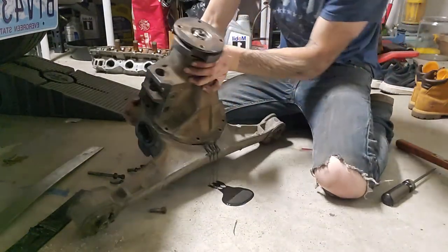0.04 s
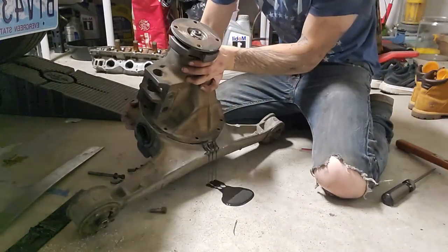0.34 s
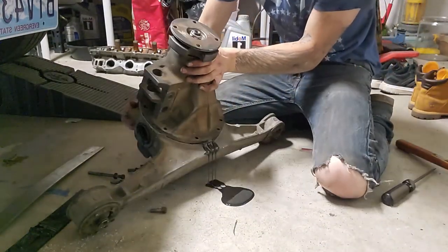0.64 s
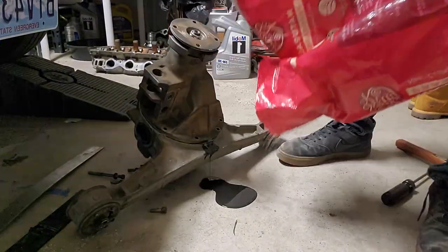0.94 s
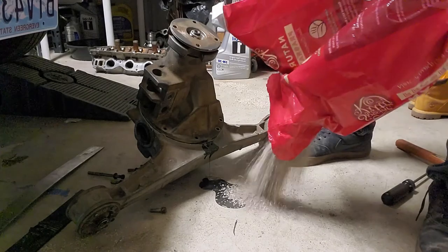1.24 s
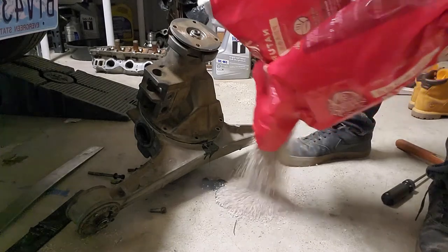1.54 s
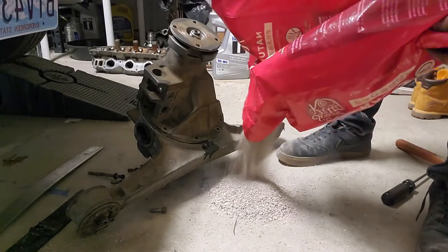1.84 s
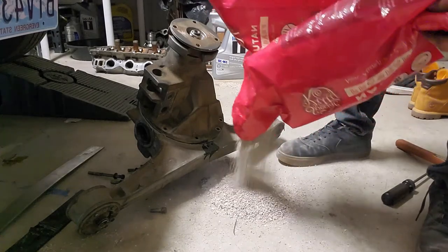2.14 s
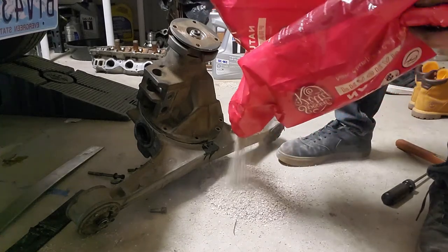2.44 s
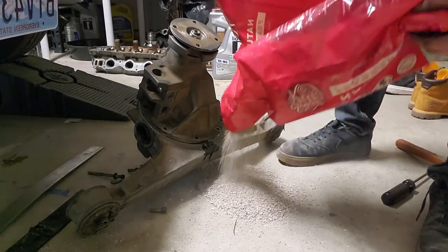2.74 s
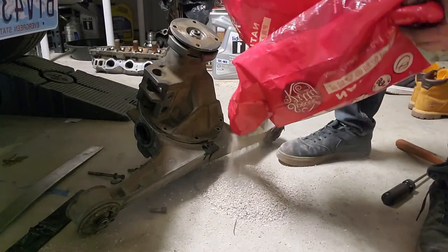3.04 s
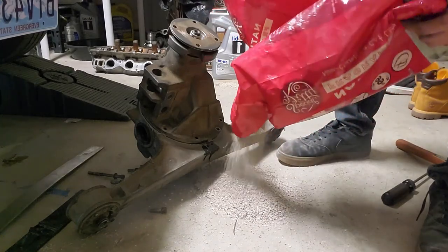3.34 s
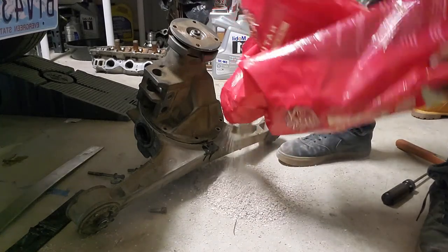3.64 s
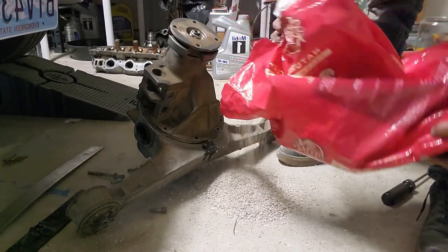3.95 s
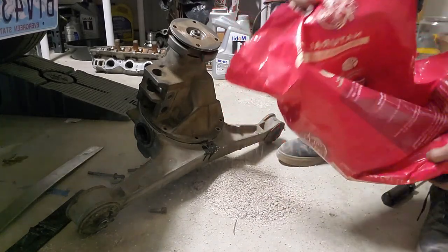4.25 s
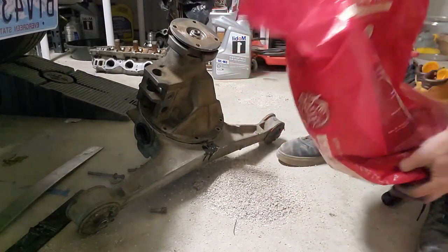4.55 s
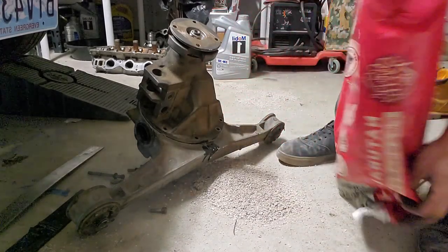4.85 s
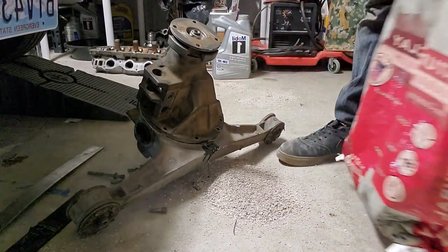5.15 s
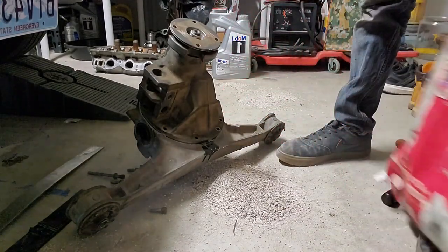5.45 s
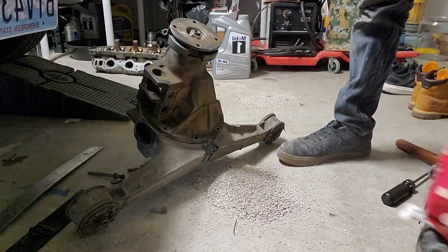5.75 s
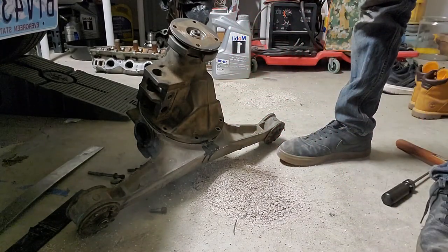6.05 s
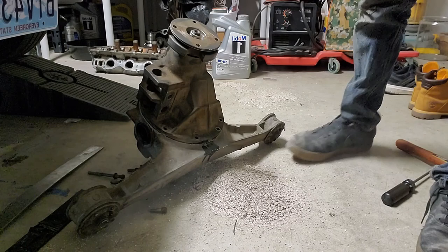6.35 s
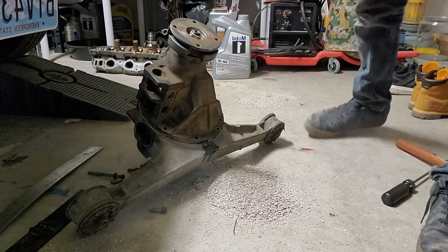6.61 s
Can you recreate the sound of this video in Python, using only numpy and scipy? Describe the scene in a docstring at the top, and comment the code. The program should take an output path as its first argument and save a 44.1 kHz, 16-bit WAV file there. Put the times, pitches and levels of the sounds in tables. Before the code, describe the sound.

After a few faint, low knocks from a metal casting, granules spill onto a concrete floor in a dense, gritty hiss that gradually tapers. The plastic bag crinkles throughout, snapping and flapping most as the pour ends. Leftover litter rushes to the bottom of the bag, then the rustling grows sparser, with a soft footstep near the end. Everything is heard close up in a fairly dry garage.

```python
"""A garage floor: a cast axle housing knocks and rings as it is steadied, then clay litter is poured
from a stiff plastic bag. The grains hiss and clack on the concrete and thin to a trickle. The bag
buckles and crackles as it is tipped, the rest of the litter slides back to its bottom, and the bag
is carried aside."""
import sys
import numpy as np
from scipy import signal
from scipy.fft import rfft, irfft
from scipy.io import wavfile
from scipy.ndimage import uniform_filter1d

SR = 44100
rng = np.random.default_rng(int(sys.argv[2]) if len(sys.argv) > 2 else 0)


def int16_out(signal):
    """Quantize to a 16-bit WAV file."""
    q = np.round(np.clip(np.atleast_2d(signal).T, -1, 1) * 32767)
    wavfile.write(sys.argv[1], SR, q.astype(np.int16))


N = 298998
TIME = np.arange(N) / SR

# spectrum of a crease in the plastic: f/Hz, level/dB
PLASTIC_SPECTRUM = [(120, -8), (400, -4), (800, 3), (2000, 2), (4500, -0.5), (7000, -3), (9000, -3.5),
                    (10700, -13.5), (13500, -13), (15800, -23)]


def pour(start_s=0.892, heap_s=0.95):
    """Litter lands on concrete; the growing heap cushions the coarse pellets."""
    stream = [(0.92, -24), (1.39, -19.5), (1.59, -24.5), (1.95, -27.5), (2.11, -31.5), (2.3, -27),
              (2.41, -27), (2.58, -29.5), (2.76, -31.5), (2.78, -28.5), (3.04, -31), (3.35, -26.5),
              (3.38, -29.5), (3.45, -27)]  # grain flow: t/s, level/dB
    spectrum = [(200, -30), (700, -2), (870, -2.5), (1400, 5), (2000, 0.5), (2900, 2), (3300, 3), (3700, 0),
                (5400, 1.5), (7000, -2), (8800, 1.5), (10700, -13.5), (13000, -6), (15800, -18)]  # grains on concrete: f/Hz, level/dB
    flow = level_curve(stream, rise_s=1.4, fall_s=2.9)
    flow *= np.clip((TIME - start_s) / 0.009, 0, 1)  # the front lands all at once
    bare_floor = np.exp(-np.maximum(TIME - start_s, 0) / heap_s)
    hiss = grains(flow, spectrum, spread_db=0.7)
    return from_db(-3) * hiss + from_db(-6) * flow * bare_floor * pellets()


def grains(flow, spectrum, spread_db, full_per_s=9000, trickle_per_s=2000):
    """Clay grains tick as they collide; a thinner flow has fewer and sounds grittier."""
    per_s = full_per_s * flow / flow.max() + trickle_per_s
    return flow * evened(coloured(impacts(per_s, spread_db), spectrum), span_s=0.057)


def pellets():
    """The coarsest grains clack on concrete."""
    modes = [(800, 300, -6.5), (1260, 410, -2), (2100, 600, -8), (3250, 450, 0.5), (5400, 900, -6.5)]  # clack resonances: f/Hz, width/Hz, level/dB
    clicks = impacts(per_s=900, spread_db=1.5)
    clacks = sum(from_db(db) * resonance(clicks * rng.standard_normal(N), hz, width_hz)
                 for hz, width_hz, db in modes)
    return evened(clacks, span_s=0.08)


def slide():
    """Litter slides to the bottom of the bag, and again as it is carried off."""
    slides = [
        [(4.42, -34.5), (4.7, -23), (4.85, -24.5), (4.97, -26.5), (5.082, -41.5), (5.24, -47)],
        [(6.055, -32.5), (6.15, -44), (6.32, -55)],
    ]  # grain flow, one list per slide: t/s, level/dB
    spectrum = [(200, -57), (600, -6), (1100, 1.5), (2100, 0.5), (4000, -1.5), (6700, -5), (8900, -4),
                (10700, -18), (13500, -13.5), (15800, -24)]  # grains in the bag: f/Hz, level/dB
    flow = sum(level_curve(rows, rise_s=0.059, fall_s=0.25) for rows in slides)
    return from_db(2.45) * grains(flow, spectrum, spread_db=3)


def plastic_bag(panel_hz=593):
    """Tugs and strain make the bag crinkle, flutter and heave; panels buckle over low thuds."""
    tugs = [(0.888, .13, -25, -23.5), (1.093, 0.066, -30, -25), (1.25, 0.22, -39, -51),
            (1.562, 0.087, -29, -37), (1.69, 0.14, -33, -27.5), (2.231, 0.097, -29.5, -35),
            (2.372, 0.18, -41, -48), (2.608, 0.027, -34, -31), (2.758, 0.067, -28, -23),
            (2.928, 0.036, -28, -23), (3.041, 0.066, -34.5, -26.5), (3.13, 0.13, -35.5, -28.5),
            (3.288, 0.048, -36, -28), (3.43, 0.043, -35, -26), (3.509, 0.1, -29, -23.5),
            (3.611, 0.14, -26, -19), (3.775, 0.096, -27.5, -18.5), (3.937, 0.091, -29, -24),
            (4.083, 0.073, -28.5, -20.5), (4.224, 0.093, -43, -26.5), (4.397, 0.34, -42, -27),
            (4.628, .17, -25.5, -23), (4.825, 0.22, -32, -32), (5.102, .04, -44, -29),
            (5.253, 0.14, -36.5, -32), (5.445, 0.08, -36, -28), (5.536, 0.063, -29.5, -30.5),
            (5.702, .08, -33.5, -31.5), (5.809, 0.047, -42, -34.5), (5.897, 0.051, -35, -34),
            (6.054, 0.098, -28.5, -28), (6.201, 0.094, -30.5, -32.5), (6.353, 0.14, -38.5, -31),
            (6.521, .06, -48, -38.5), (6.712, 0.12, -40, -39)]  # tugs, shakes, swings: t/s, length/s, flex/dB, crinkle/dB
    strain_levels = [(.95, -27), (2.1, -43.5), (2.72, -43.5), (2.9, -36.5), (3.7, -31.5), (4.9, -25),
                     (5.2, -43.5), (6.3, -37), (6.65, -49)]  # strain between tugs: t/s, level/dB
    buckles = [(1.009, -18.5), (1.713, -23.5), (1.814, -23), (1.834, -19.5), (2.048, -25.5), (2.278, -21),
               (2.299, -24), (2.768, -21), (3.306, -20), (3.633, -15), (3.694, -14.5), (3.802, -24),
               (5.589, -34), (6.364, -27)]  # whole panels buckling: t/s, level/dB
    thuds = [(1.715, -26.5, 100), (1.81, -33, 95), (2.29, -23, 320), (2.39, -34, 75), (3.31, -32, 90),
             (3.64, -31, 80), (4.3, -28.5, 130), (5.32, -28, 225), (5.335, -35, 60.4), (6.449, -25.5, 217)]  # low thuds of the bag and a footstep: t/s, level/dB, f/Hz
    start_s, length_s, flex_db, crinkle_db = np.transpose(tugs)
    strain = level_curve(strain_levels, rise_s=0.06, fall_s=0.93)
    resting_flex = from_db(-4.5) * strain
    flex = np.hypot(tug_curve(start_s, length_s, flex_db), resting_flex)
    # the load answers lower down and settles more slowly
    heave = np.hypot(tug_curve(start_s, length_s, flex_db, release_s=0.023), resting_flex)
    creasing = np.hypot(tug_curve(start_s, length_s, crinkle_db), from_db(1.5) * strain)
    bag = from_db(-4) * creasing * crinkle()
    bag += from_db(-5.5) * flex * flutter(low_hz=203, high_hz=815, per_s=300, damping=0.3, count=12)
    bag += from_db(-16.5) * heave * flutter(low_hz=67, high_hz=196, per_s=130, damping=0.55, count=10)
    bag += from_db(-0.5) * flaps([(s, db, panel_hz) for s, db in buckles], decay_cycles=4.5, damping=0.41)
    bag += from_db(14.5) * creasing * ticks()
    bag += from_db(-0.5) * snaps()
    return bag + flaps(thuds, decay_cycles=2.5, damping=0.94)


def tug_curve(starts_s, lengths_s, levels_db, attack_s=0.0067, release_s=0.017):
    """Gain that rises with each tug, holds, then relaxes."""
    power = np.zeros(N)
    for s, length_s, db in zip(starts_s, lengths_s, levels_db):
        rise = 1 - np.exp(-np.maximum(TIME - s, 0) / attack_s)
        relax = np.exp(-np.clip((TIME - s - length_s) / release_s, 0, 20))
        power += (from_db(db) * rise * relax) ** 2
    return np.sqrt(power)


def snaps(crackle_s=0.0042, strain_s=0.0006, size=2048):
    """The sheet creaks up to a spike as a large crease flips, then crackles and rings briefly."""
    creases = [(0.894, -18.5, 1960, 2, 4.5), (0.945, -15.5, 3900, 22, 0), (1.0134, -13, 2650, 11, -13),
               (1.637, -17, 3020, 16, -12), (2.2157, -15, 3950, -3, -5), (2.315, -19.5, 5240, 1, -2),
               (2.4378, -20, 2150, 6.5, 12.5), (2.7778, -23.5, 1340, 6, 9), (2.9397, -22.5, 1020, 0, 4),
               (3.2337, -29.5, 1940, 2, 19), (3.3098, -15.5, 2540, 0, 4), (3.3556, -11.5, 4130, 6, -9.5),
               (3.4739, -23, 1970, 15, 2), (3.5249, -15.5, 1450, 8, -3), (3.5751, -28, 1990, 18, 15),
               (3.6402, -11, 953, 9, -15), (3.6594, -13, 1730, 11, -4.5), (3.7, -13, 910, 2, -15),
               (3.7773, -14.5, 1790, 2, -6), (3.8156, -10.5, 3420, -1, -8), (3.8564, -27, 1780, 15, 1),
               (3.934, -19, 1290, 21, -17), (3.9633, -12, 4140, 15, 1), (3.9841, -15, 1460, 11, -15),
               (4.0731, -12.5, 4740, 11, -21), (4.087, -19.5, 1520, 0, 3), (4.1374, -19.5, 1340, 25.5, 5),
               (4.2877, -26, 1490, 20, 4), (4.3694, -16.5, 4700, 12, -1), (4.3844, -25, 2400, 7, 8),
               (4.3994, -18, 1510, 5, -14), (4.4903, -15, 2830, 8, -4), (4.6266, -14.5, 1940, 3, -7),
               (4.7861, -13.5, 2150, 4, 4.5), (5.2807, -32, 1410, 0, 16), (5.3142, -24, 1190, 2, 8.5),
               (5.4554, -27, 2900, 5, 8.5), (5.5469, -28, 4700, 5, 11), (5.5616, -26.5, 2640, 8, 12),
               (5.7045, -25.5, 950, 5, 7), (5.7393, -24, 2840, 8, 8.5), (5.7752, -27, 925, 11, 12),
               (5.892, -27.5, 860, 13, 6), (5.9272, -26, 923, 8, 12), (6.1248, -25.5, 1010, 20, 4),
               (6.2816, -23.5, 956, 12, 2), (6.3648, -16, 3760, 1, 0), (6.4378, -19, 5560, 5, 10.5),
               (6.4482, -25.5, 2340, 4, 11)]  # flips: t/s, crackle/dB, f/Hz, spike/dB re crackle, ring/dB re crackle
    out, spike_at = np.zeros(N), size // 8
    t = TIME[:size] - TIME[spike_at]
    swell = np.exp(-np.maximum(t / crackle_s, -t / strain_s))
    for s, crackle_db, hz, spike_db, ring_db in creases:
        burst = swell * rng.standard_normal(size)
        burst[spike_at] = from_db(spike_db)
        ring = resonance(burst, hz, hz / 3)  # broad: plastic is well damped
        add(out, s + strain_s - TIME[spike_at], from_db(crackle_db) * (burst + from_db(ring_db) * ring))
    return coloured(out, PLASTIC_SPECTRUM)


def crinkle(per_s=600, count=6):
    """A shower of small creases; each size rings at its own pitch."""
    spectrum = [(120, -26), (400, 0.5), (800, 4), (1300, 1.5), (2200, 0.5), (4500, -4), (7000, -4),
                (9000, -4.5), (10700, -15), (13500, -16), (15800, -21)]  # crinkling sheet: f/Hz, level/dB
    shower = np.zeros(N)
    for hz in np.geomspace(700, 5000, count):
        bursts = crackle(impacts(per_s / count, spread_db=4), tail_s=0.0055, tail_db=-16)
        shower += bursts + from_db(9.5) * resonance(bursts, hz, 0.41 * hz)
    return evened(coloured(shower, spectrum), span_s=0.04)


def ticks(per_s=30, spread_db=4.5):
    """Lone small creases flick over with a dry tick."""
    sizes = from_db(spread_db * np.clip(rng.standard_normal(N), -2, 1))
    clicks = sizes * (rng.random(N) < per_s / SR)
    return coloured(crackle(clicks, tail_s=0.002, tail_db=-21), PLASTIC_SPECTRUM)


def crackle(clicks, tail_s, tail_db):
    """Crease clicks, each with a short noisy tail."""
    tail_power = signal.lfilter([1], [1, -np.exp(-1 / (tail_s * SR))], clicks ** 2 + 1e-18)
    return clicks + from_db(tail_db) * np.sqrt(tail_power) * rng.standard_normal(N)


def flutter(low_hz, high_hz, per_s, damping, count):
    """Small buckles strike the damped modes of the bag wall, each with new strengths."""
    clicks = impacts(per_s, spread_db=5)
    modes = sum(resonance(clicks * rng.standard_normal(N), hz, damping * hz)
                for hz in np.geomspace(low_hz, high_hz, count))
    band = signal.butter(2, [low_hz / 2 ** 0.5, high_hz * 2 ** 0.5], "band", fs=SR, output="sos")
    return evened(signal.sosfilt(band, modes), span_s=0.0497)


def flaps(rows, decay_cycles, damping, size=8000):
    """A short uneven push gives a hollow flap or thud; lower ones last longer."""
    out = np.zeros(N)
    for s, db, hz in rows:
        push = rng.standard_normal(size) * np.exp(-TIME[:size] * hz / decay_cycles)
        flap = resonance(resonance(push, hz, damping * hz), hz, damping * hz)
        add(out, s, from_db(db) * flap / np.abs(flap).max())
    return out


def housing(contact_cut_hz=850, grind_s=0.014, grind_db=-12, attack_s=0.0018):
    """Each soft knock grinds on the floor and sets the heavy casting ringing."""
    knocks = [(0.054, -58), (0.076, -53), (0.128, -42.5), (0.154, -39), (0.238, -45), (0.28, -32.5),
              (0.378, -43), (0.451, -53), (0.565, -52.5), (0.869, -45)]  # rocking on the floor: t/s, level/dB
    modes = [(71.7, -15.5, .7), (256.3, 7, 0.19), (287, -9, 0.071), (394, -26, 0.1), (503, -27, 0.19),
             (715, -31, 0.097), (896, -26, 0.25), (1120, -28, 0.092)]  # casting modes: f/Hz, level/dB, T60/s
    t, out = TIME[:SR], np.zeros(N)
    soft_contact = signal.butter(4, contact_cut_hz, fs=SR, output="sos")
    attack = 1 - np.exp(-t / attack_s)
    ring = sum(from_db(db - 60 * t / t60_s) * np.sin(2 * np.pi * hz * t) for hz, db, t60_s in modes)
    for s, db in knocks:
        grind = resonance(rng.standard_normal(SR), hz=290, width_hz=200) * np.exp(-t / grind_s)
        grind *= from_db(grind_db) / grind[:SR // 100].std()
        knock = signal.sosfilt(soft_contact, attack * (ring + grind))
        add(out, s, from_db(db) * knock / np.abs(knock).max())
    return out


def rubs():
    """Friction of hands, clothing and bag swells and fades with each stroke."""
    strokes = [(0.087, 0.088, -77, 3000), (0.501, 0.18, -77, 980), (6.06, 0.087, -35, 1000),
               (6.19, .15, -37, 900), (6.663, 0.074, -43, 5040)]  # rubbing: t/s, length/s, level/dB, f/Hz
    out = np.zeros(N)
    for s, length_s, db, hz in strokes:
        hiss = resonance(resonance(rng.standard_normal(SR), hz, hz), hz, hz)
        swell = np.hanning(int(length_s * SR))
        add(out, s, from_db(db) * swell * hiss[:len(swell)] / hiss.std())
    return out


def garage(x, t60_s=0.16, echo_db=-17.5, wall_cut_hz=6000):
    """Adds the slightly dull, scattered echoes of a cluttered room."""
    t = TIME[:SR // 2]
    tail = rng.standard_normal(len(t)) * from_db(-60 * t / t60_s) * (t > 0.005)
    tail = signal.sosfilt(signal.butter(1, wall_cut_hz, fs=SR, output="sos"), tail)
    return x + from_db(echo_db) * signal.oaconvolve(x, tail / np.linalg.norm(tail))[:N]


def room_air():
    """Faint, steady, mostly low noise."""
    spectrum = [(18, -56), (30, -22), (71, 13), (394, -4), (815, 0), (1480, -9), (1780, -6), (2770, -12),
                (5440, -12.5), (15000, -19)]  # garage air: f/Hz, level/dB
    return from_db(-77) * coloured(rng.standard_normal(N), spectrum)


def from_db(db):
    """Decibels to gain."""
    return 10 ** (np.asarray(db) / 20)


def level_curve(rows, rise_s, fall_s):
    """Gain through (t/s, level/dB) rows; outside them it fades 60 dB per rise_s or fall_s."""
    s, db = np.transpose(rows)
    outside = np.maximum(s[0] - TIME, 0) / rise_s + np.maximum(TIME - s[-1], 0) / fall_s
    return from_db(np.interp(TIME, s, db) - 60 * np.minimum(outside, 2))


def evened(x, span_s):
    """Holds the rms near 1 over span_s; quicker crackle stays."""
    power = uniform_filter1d(x ** 2, max(int(span_s * SR), 2))
    return x / np.sqrt(np.abs(power) + np.mean(x ** 2) / 20)


def coloured(x, spectrum, size=2048):
    """Minimum-phase filter of unit energy with the given spectrum."""
    hz, db = np.transpose(spectrum)
    grid_hz = np.maximum(np.arange(size // 2 + 1) * SR / size, 1)
    gain = from_db(np.interp(np.log(grid_hz), np.log(hz), db))
    cepstrum = irfft(np.log(gain))
    cepstrum[1:size // 2] *= 2
    cepstrum[size // 2 + 1:] = 0
    response = irfft(np.exp(rfft(cepstrum)))
    return signal.oaconvolve(x, response / np.linalg.norm(response))[:N]


def resonance(x, hz, width_hz):
    """Two-pole resonance, peak gain 1."""
    r = np.exp(-np.pi * width_hz / SR)
    feedback = [1, -2 * r * np.cos(2 * np.pi * hz / SR), r * r]
    return signal.lfilter(np.array([1, 0, -1]) * (1 - r * r) / 2, feedback, x + 1e-18)


def impacts(per_s, spread_db):
    """Random clicks of either sign: many small, a few large."""
    sizes = from_db(spread_db * np.minimum(rng.exponential(1, N), 4)) * rng.choice([-1, 1], N)
    return sizes * (rng.random(N) < per_s / SR)


def add(track, s, sound):
    """Mixes a sound into the track at time s."""
    start = max(round(s * SR), 0)
    track[start:start + len(sound)] += sound[:N - start]


def scene():
    """Litter, bag and housing in the quiet garage."""
    litter = pour() + slide()
    air = room_air()
    return (garage(litter + plastic_bag() + housing() + rubs()) + air)[None]


def record(dry, low_cut_hz=32, high_cut_hz=16000, ceiling=0.8):
    """The microphone sheds deep bass, rounds high peaks and cuts the top."""
    dry = signal.sosfilt(signal.butter(2, low_cut_hz, "high", fs=SR, output="sos"), dry)
    rounded = dry / (1 + (dry / ceiling) ** 4) ** 0.25
    return signal.sosfilt(signal.ellip(10, 0.1, 70, high_cut_hz, fs=SR, output="sos"), rounded)


dry = scene()
out = record(dry)
int16_out(out)
```